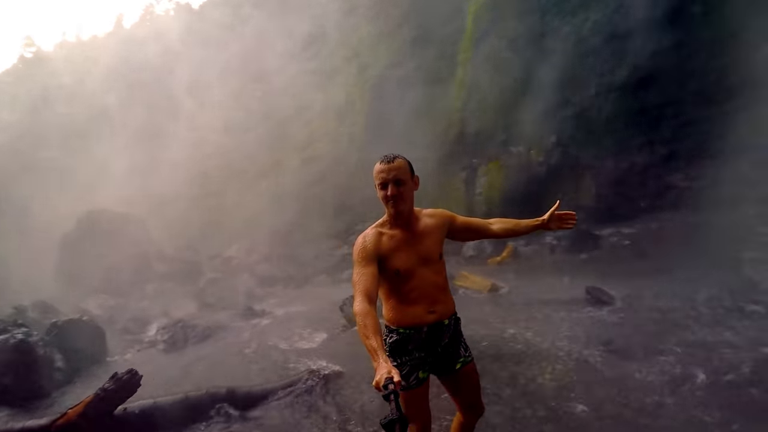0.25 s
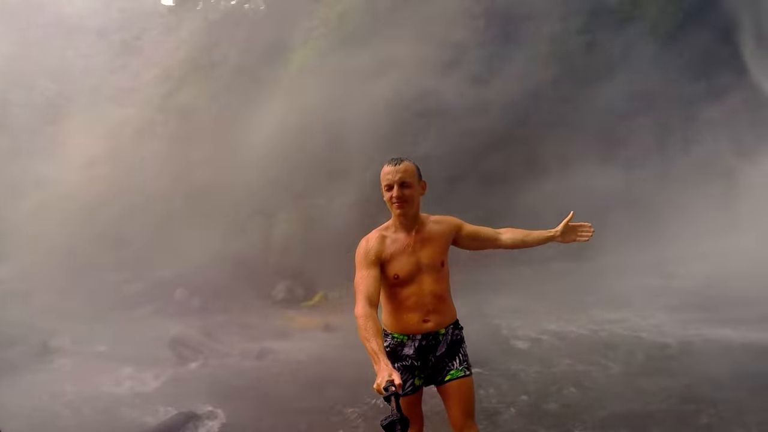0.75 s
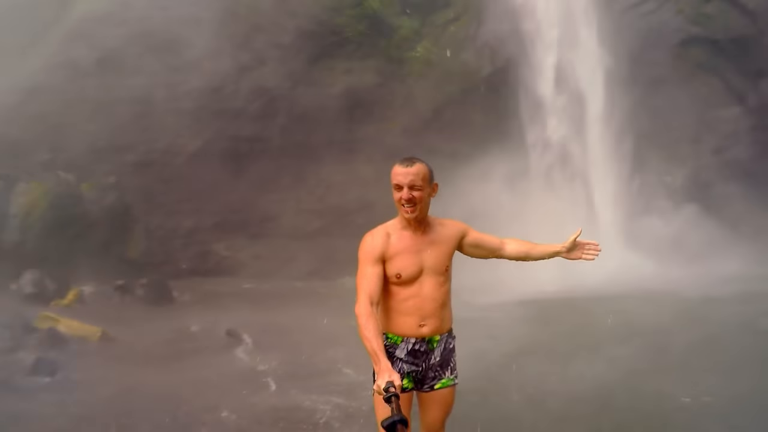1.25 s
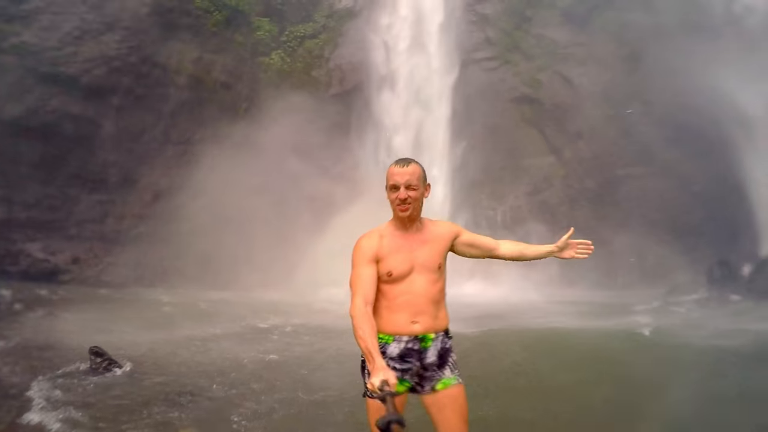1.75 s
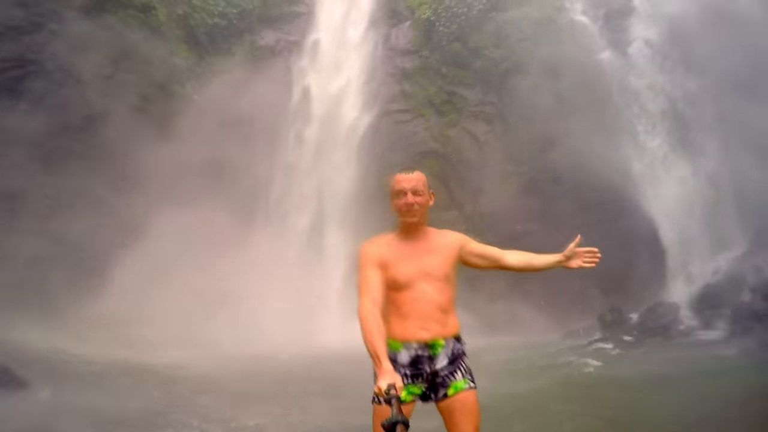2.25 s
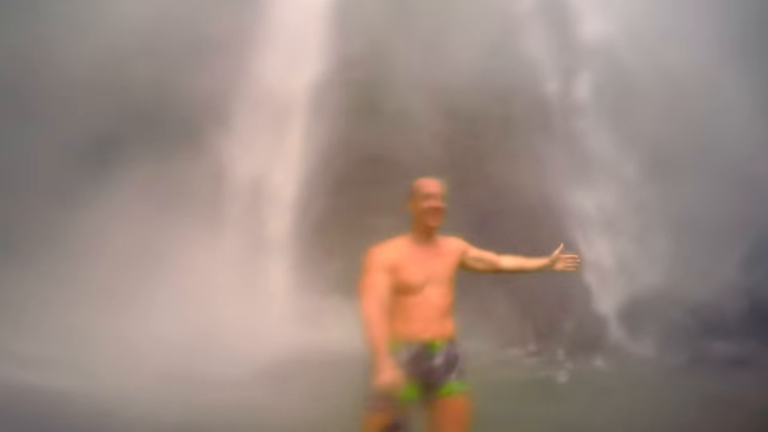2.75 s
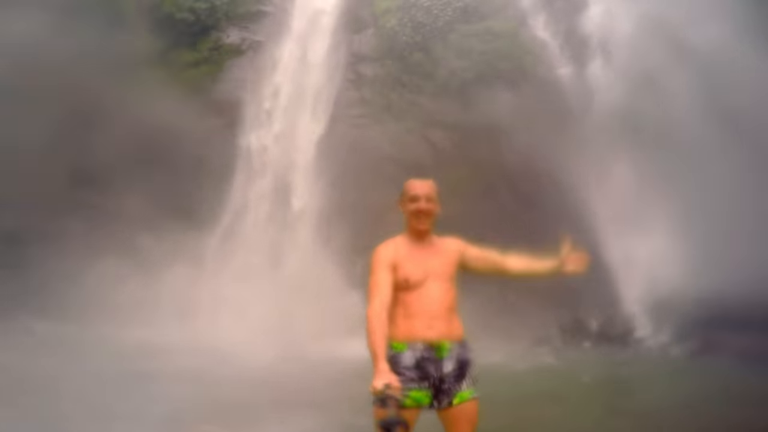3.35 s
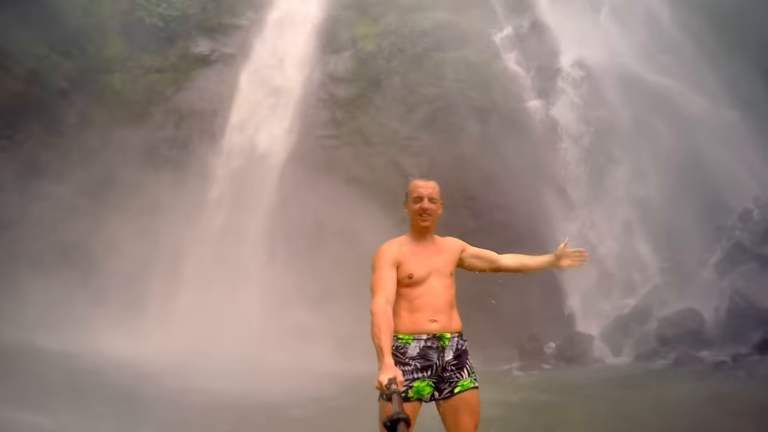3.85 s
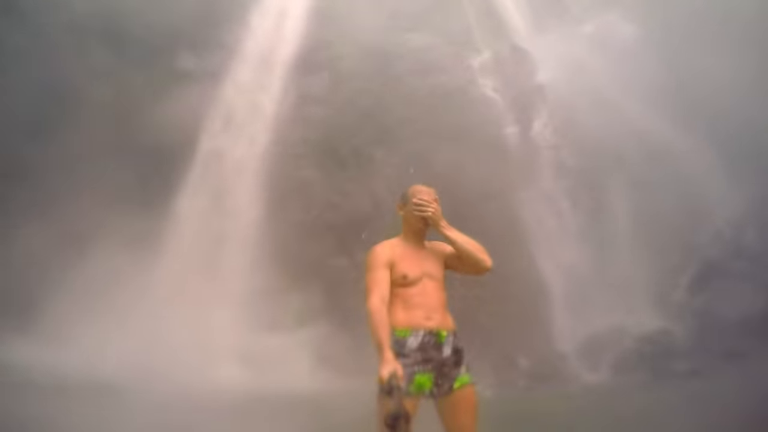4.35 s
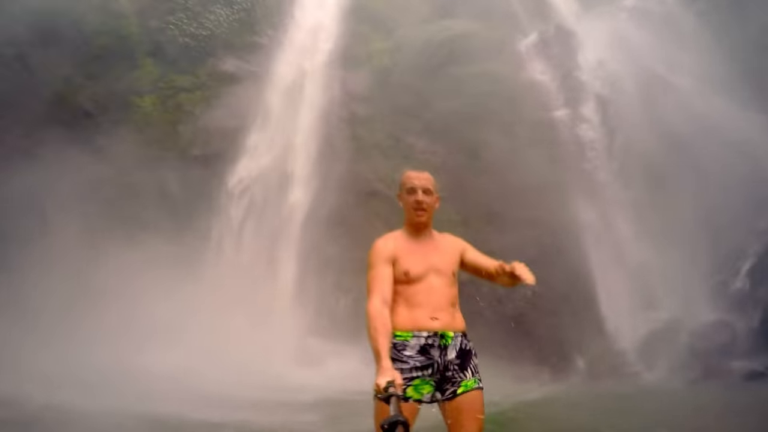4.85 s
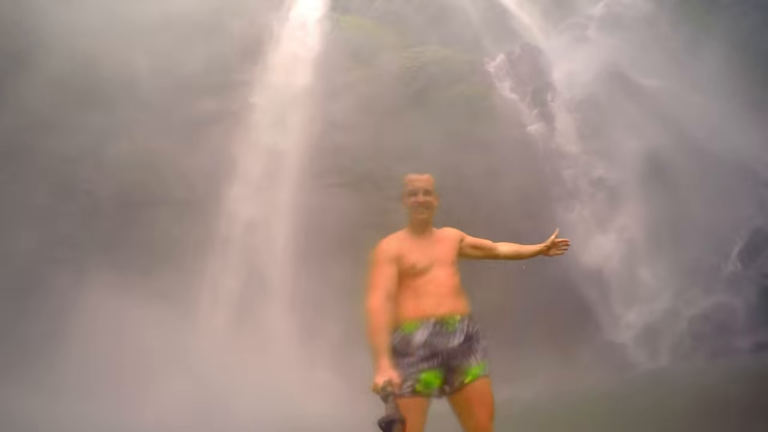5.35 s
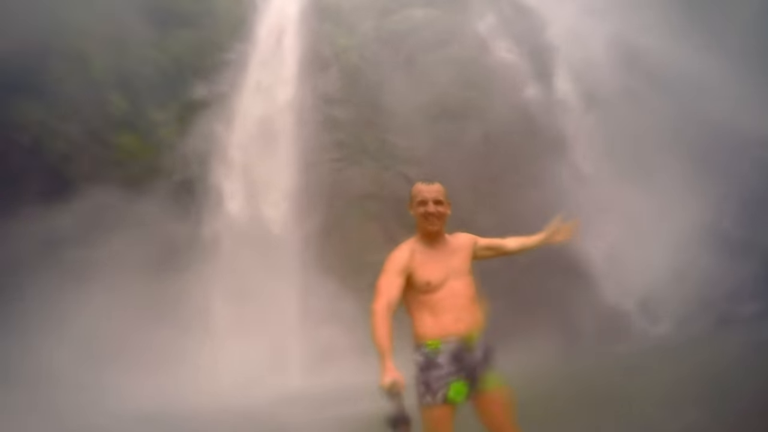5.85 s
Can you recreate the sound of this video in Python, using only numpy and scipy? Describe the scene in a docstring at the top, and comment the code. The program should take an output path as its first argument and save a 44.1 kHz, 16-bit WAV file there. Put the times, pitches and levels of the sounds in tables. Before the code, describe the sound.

Wind drones and thumps on an encased microphone beside a roaring waterfall, then spray bursts, fat drops and heavy splashes crackle against it.

```python
"""A tall waterfall beats into its pool, close to a microphone in a waterproof case; its roar is steady noise.
From the start, air booms and drones on the case, and gusts swell a splashing rush of noise and impulses.
At about 0.6 s water gurgles over the port; from 1 s a fine spray of noise, ticks and pings never stops.
From 0.3 s, thickest after 2 s, fat drops slap and ring; long rings are bubbles in the water film.
Heavy slugs of water thud between 2.4 and 2.7 s; the hardest hits overload the microphone."""
import sys
import numpy as np
from scipy import signal
from scipy.fft import rfft, irfft, next_fast_len
from scipy.io import wavfile
from scipy.ndimage import uniform_filter1d, map_coordinates

SR = 44100
rng = np.random.default_rng(int(sys.argv[2]) if len(sys.argv) > 2 else 0)


def store_pcm(level_fs):
    """Save levels as 16-bit WAV."""
    pcm = np.round(np.clip(level_fs, -1, 1) * 32767).astype(np.int16)
    wavfile.write(sys.argv[1], SR, np.atleast_2d(pcm).T)


N = 268789

# spectrum of drops hitting the case, before its resonances: (frequency [Hz], relative level [dB])
PATTER_SPECTRUM = [(150, -30.5), (500, -27.5), (1000, -16), (1600, -2), (2600, 1.5), (4400, 1.5),
                   (5600, -4.5), (7000, -3.5), (9500, -15.5), (12800, -14.5), (15200, -21.5)]


def water(rush_db, spray_db):
    """The splashing rush of the fall, and spray pattering on the case; both flicker in quick flurries."""
    # spectrum of the rush, before the case: (frequency [Hz], relative level [dB])
    rush_spectrum = [(60, -4.5), (200, -3.5), (350, -7.5), (550, -4.5), (800, -4), (1050, 0), (1600, -5),
                     (2600, -1.5), (3300, -8.5), (6000, -23), (15000, -42)]
    # spectrum of the fine spray, before the case: (frequency [Hz], relative level [dB])
    mist_spectrum = [(150, -33), (500, -14.5), (1000, -13), (1600, -9), (2600, -2.5), (4400, 0.5),
                     (5600, -4.5), (7000, -3), (9500, -10), (12800, -8), (15200, -16)]
    flurry = wobble(70)

    splash = 0.66 * rng.standard_normal(N) + 0.71 * impacts(count=4000, spread_db=3.5)
    rush_bubbles = bubbles(count=1500, pitch_hz=1590, scatter=0.127, cycles=37, spread_db=2.5)
    rush = unit(through_case(splash, rush_spectrum) + 0.68 * rush_bubbles)

    fine_drops = rng.standard_normal(N) + 0.5 * impacts(count=20000, spread_db=6.0)
    mist = through_case(fine_drops, mist_spectrum)
    hits = 0.66 * impacts(count=6000, spread_db=5.0) + ticks(count=600, spread_db=2.5, t60=0.0038)
    patter = through_case(hits, PATTER_SPECTRUM)
    pings = bubbles(count=2000, pitch_hz=3730, scatter=0.203, cycles=18, spread_db=5.0)
    spray = unit(0.47 * mist + 0.99 * patter + 0.42 * pings)

    rush_gain = amp(rush_db + 0.18 + 0.49 * flurry + 1.9 * wobble(45))
    spray_gain = amp(spray_db + 3.5 + 1.69 * flurry)
    return rush_gain * rush + spray_gain * spray


def drops_and_bubbles():
    """Most drops slap the case with noise and ring upward; long rings are film bubbles, almost without slap."""
    # fat drops on the case, and the gurgle's bubble with its overtone at 0.74 s; before the trims below:
    # (time [s], level [dB], starting ring pitch [Hz], ring decay by 60 dB [s])
    drop_rings = [(0.274, -7, 2880, 0.0074), (0.405, -11, 2950, 0.0072), (0.738, 4.5, 943, 0.034),
                  (0.74, -10, 1760, 0.021), (0.958, -16, 3800, 0.0092), (1.0557, 2.5, 2740, 0.012),
                  (1.207, -1.5, 3010, 0.013), (1.466, 2, 2760, 0.012), (1.492, 1, 1700, 0.012),
                  (1.647, 3, 4040, 0.013), (2.118, -5, 2600, .006), (2.189, 0.5, 2540, 0.0053),
                  (2.22, 1.5, 4600, 0.007), (2.339, 2.5, 1390, 0.012), (2.376, 8, 2630, 0.0062),
                  (2.378, 6.5, 1710, 0.0067), (2.431, 5, 3730, .007), (2.454, 5.5, 4270, 0.0032),
                  (2.4885, -2, 4600, 0.0033), (2.495, 2, 4180, 0.0037), (2.507, 5, 4650, 0.0038),
                  (2.685, 5.5, 2630, 0.0084), (2.7767, 1, 2400, 0.0025), (2.835, -3, 6840, 0.0034),
                  (3.077, -19, 490, 0.039), (3.246, -3, 4000, .005), (3.586, 3.5, 2880, 0.0061),
                  (3.653, -4, 2850, 0.017), (3.674, -5, 3800, 0.016), (3.69, 1.5, 3460, 0.013),
                  (3.72, -2.5, 2880, 0.013), (3.7721, 9, 1590, .012), (3.806, -2, 1640, .011),
                  (4.081, -3.5, 2600, 0.013), (4.123, 2, 1500, 0.011), (4.133, 3, 4270, 0.0069),
                  (4.138, 2.5, 1860, 0.0091), (4.185, 8, 4520, 0.0036), (4.233, 4, 1570, 0.0038),
                  (4.262, 3, 3870, .007), (4.285, 5, 2740, 0.0096), (4.378, 4.5, 4200, 0.0047),
                  (4.65, 8, 1850, 0.0039), (4.706, 6, 4030, 0.0031), (4.777, 10.5, 2540, 0.0056),
                  (4.7908, -6, 2600, 0.0084), (4.872, -9.5, 2800, 0.0051), (4.899, -14, 4200, .004),
                  (4.9213, -11, 4200, 0.0033), (4.943, -13.5, 3330, 0.0038), (5.307, -7, 1570, 0.014),
                  (5.336, 3, 4400, .005), (5.391, 5, 2470, 0.0026), (5.3974, 4.5, 4120, 0.0066),
                  (5.541, 8.5, 2680, 0.0072), (5.745, -7.5, 2420, 0.0076), (5.851, -8.5, 4160, 0.0066),
                  (6.051, -0.5, 2450, 0.0042)]
    rings, slaps = np.zeros((2, N + SR))
    t = np.arange(SR // 12) / SR
    for s, db, hz, t60 in drop_rings:
        start = round(s * SR)
        ring = amp(-60 * t / t60) * np.sin(2 * np.pi * hz * t * (1 + 0.063 * t / t60))
        onset = 1 - np.exp(-t / 0.00037)
        rings[start:][:len(t)] += amp(db - 2.0) * ring * onset
        # a sharp burst with a weaker, slower tail
        splash = amp(-60 * t / 0.0048) + amp(-19.5 - 60 * t / 0.018)
        # long rings are bubbles in the water film: little or no slap
        slap_db = db - 24 * max(0, np.log2(t60 / 0.011))
        slaps[start:][:len(t)] += amp(slap_db - 3.0) * splash * rng.standard_normal(len(t))
    return rings[:N] + coloured(slaps[:N], lambda hz: along(PATTER_SPECTRUM, hz) + case_db(hz))


def slugs():
    """A mass of water lands on the case: a short, full thud of decaying noise."""
    # heavy slugs, levels before a 1 dB trim: (time [s], level [dB])
    slug_hits = [(2.378, -8.5), (2.431, -4), (2.445, -17), (2.686, -11.5)]
    # spectrum of the thud, before the case: (frequency [Hz], relative level [dB])
    thud_spectrum = [(60, -14), (150, 8), (300, -2.5), (550, 1.5), (900, 2), (1700, -2), (3000, -3),
                     (5000, -11), (12000, -44)]
    force = np.zeros(N + SR)
    t = np.arange(SR // 8) / SR
    for s, db in slug_hits:
        force[round(s * SR):][:len(t)] += amp(db - 1 - 60 * t / 0.042)
    return force[:N] * through_case(rng.standard_normal(N), thud_spectrum)


def gurgle():
    """A film of water bubbles dully across the microphone port: dense impulses and low bubble rings."""
    # level of the water over the port: (time [s], level [dB])
    port_level = [(.59, -53), (.615, -30), (.632, -20.5), (.655, -22.5), (.67, -31), (.695, -23.5),
                  (.73, -30.5), (.77, -32), (.85, -64)]
    # spectrum of the froth on the port, before the case: (frequency [Hz], relative level [dB])
    wet_port_spectrum = [(100, -5), (350, 1.5), (650, 1.5), (1000, 7), (1400, -5), (2000, -11), (2600, -2),
                         (3100, -41), (8000, -32)]
    level_db, = curves(port_level)
    froth = through_case(impacts(count=20000, spread_db=3.5), wet_port_spectrum)
    blubs = bubbles(count=2000, pitch_hz=1070, scatter=0.09, cycles=11, spread_db=-1.0)
    return amp(level_db) * unit(froth + 0.5 * blubs)


def wind():
    """The downdraught heaves on the case; each buffet makes it boom and drone with an uneven flutter."""
    # slow heave of the air under the fall, before trim: (time [s], level [dB])
    downdraught = [(0.0, -31), (0.29, -29), (0.66, -29), (0.76, -20), (1.1, -17.5), (1.39, -34),
                   (1.46, -25), (1.87, -32), (2.42, -36), (2.47, -43), (2.68, -25.5), (2.76, -41),
                   (3.41, -30.5), (4.82, -37), (4.87, -61), (5.24, -29.5), (5.82, -48), (6.09, -43)]
    # buffets of air on the case, before trim and flutter:
    # (time at full strength [s], hold [s], boom level [dB], drone level [dB])
    buffets = [(0.13, 0.23, -28, -17), (0.45, 0.14, -27.5, -15.5), (0.66, 0.16, -30, -19.5),
               (1.03, 0.052, -17.5, -23), (1.15, 0.27, -17.5, -31), (1.48, 0.054, -12.5, -49),
               (1.69, 0.032, -17, -38), (1.8, 0.39, -23.5, -33), (2.07, 0.15, -17.5, -31.5),
               (2.27, 0.13, -17, -27.5), (2.5, 0.37, -28.5, -40), (2.88, 0.02, -44, -28),
               (3.03, 0.17, -24, -36.5), (3.29, 0.15, -22, -30.5), (3.56, 0.29, -30.5, -45.5),
               (4.01, 0.31, -29.5, -36), (4.57, 0.099, -28, -28.5), (4.7, 0.026, -30.5, -43),
               (5.09, 0.46, -31.5, -41.5), (5.62, 0.15, -42, -53), (6.03, 0.04, -23, -36)]
    heave_db, = curves(downdraught)
    boom_power, drone_power = swells(buffets)
    boom_db = level_of(boom_power, floor_db=-48) + 1.36 * wobble(17)
    drone_db = level_of(drone_power, floor_db=-58) + 1.9 * wobble(22) - 2.5
    heave = buffet(centre_hz=19.7, width_hz=8.2, gain_db=0.59, steadiness=0.24)
    boom = buffet(centre_hz=49.5, width_hz=8.2, gain_db=0.92, steadiness=0.63)
    drone = buffet(centre_hz=103.6, width_hz=10.3, gain_db=0, steadiness=0.29)
    return amp(heave_db + 0.5) * heave + amp(boom_db) * boom + amp(drone_db) * drone


def buffet(centre_hz, width_hz, gain_db, steadiness):
    """Turbulence (noise) rings one low resonance; a steadier flow evens out its swells."""
    def resonance_db(hz):
        detuning = (hz ** 2 - centre_hz ** 2) / (2 * width_hz * (hz + 1))
        return -20 * np.log10(1 + detuning ** 2)

    band = coloured(rng.standard_normal(N), resonance_db)
    power = np.abs(uniform_filter1d(band ** 2, SR // 16)) + 1e-12
    even = band / power ** (np.clip(steadiness, 0, 1) / 2)
    # steep low-pass at 132 Hz
    low = coloured(even, lambda hz: -10 * np.log10(1 + (hz / 132) ** 20))
    return amp(gain_db) * unit(low)


def far_fall():
    """The even roar of the plunge pool behind everything: steady noise."""
    # spectrum of the roar, before the case: (frequency [Hz], relative level [dB])
    far_spectrum = [(120, 2), (250, 3.5), (500, 1), (1000, 4), (2600, -6), (4500, -2), (7000, -6),
                    (10000, -8), (15000, -32)]
    return amp(-48.0) * through_case(rng.standard_normal(N), far_spectrum)


def impacts(count, spread_db):
    """Random impulses, many small and a few large; rms 1."""
    when, size, sign = rng.random((count, 3)).T
    weight = amp(-spread_db * np.log(size + 0.0044)) * np.sign(sign - 0.5)
    return unit(np.bincount((when * N).astype(int), weight, N))


def ticks(count, spread_db, t60):
    """Middle-sized drops that each burst into a short spatter of noise, 60 dB down after t60 s; rms 1."""
    t = np.arange(SR // 50) / SR
    hits = np.abs(impacts(count=count, spread_db=spread_db))
    envelope = signal.fftconvolve(hits, amp(-60 * t / t60))[:N]
    return unit(envelope * rng.standard_normal(N))


def bubbles(count, pitch_hz, scatter, cycles, spread_db):
    """Droplets that each ring at their own pitch, falling 60 dB in the given cycles; rms 1."""
    when, size, tone = rng.random((count, 3)).T[:, :, None]
    hz = np.clip(pitch_hz * (tone / (1 - tone)) ** scatter, SR / 100, SR / 5)
    k = np.arange(SR // 100)
    turns = hz * k / SR
    level_db = -spread_db * np.log(size + 0.027) - 60 * turns / cycles
    rings = amp(level_db) * np.sin(2 * np.pi * turns)
    places = (when * N).astype(int) + k
    return unit(np.bincount(places.ravel(), rings.ravel(), N)[:N])


def case_db(hz):
    """The peaks and dips in dB that the resonances of the case add to a sound."""
    # resonances of the case: (frequency [Hz], width [Hz], lift [dB])
    case_modes = [(358, 28, -18.5), (1600, 470, 6), (2076, 200, -4.5), (2400, 226, 6), (2800, 260, 5),
                  (3310, 810, -5), (4280, 2800, 3.5), (5480, 370, -3.5), (6770, 460, 2), (7560, 550, -4.5),
                  (8120, 940, 3)]
    return sum(db / (1 + (2 * (hz - centre) / width) ** 2) for centre, width, db in case_modes)


def through_case(x, spectrum):
    """Give x a spectrum and the resonances of the case; rms 1."""
    return unit(coloured(x, lambda hz: along(spectrum, hz) + case_db(hz)))


def coloured(x, gain_db, size=32768):
    """x through the causal minimum-phase filter whose gain is gain_db(Hz)."""
    cepstrum = irfft(np.log(amp(gain_db(np.fft.rfftfreq(size, 1 / SR))) + 1e-6))
    # folding the cepstrum forward in time makes the filter causal
    cepstrum[1:size // 2] *= 2
    cepstrum[size // 2 + 1:] = 0
    return signal.fftconvolve(x, irfft(np.exp(rfft(cepstrum))))[:N]


def swells(rows):
    """Power of (time, hold, level, ..) events that rise, hold and die away; one curve per level column."""
    attack_s, release_s = 0.028, 0.074  # time to rise and to die away by 10 dB
    t = np.linspace(0, N / SR, N // 40)
    start, hold, *levels = np.transpose(rows)
    before = np.maximum(start[:, None] - t, 0) / attack_s
    after = np.maximum(t - (start + hold)[:, None], 0) / release_s
    power = amp(levels) ** 2 @ amp(-10 * (before + after)) ** 2
    return curves(np.column_stack([t, *power]))


def level_of(power, floor_db):
    """Level in dB of a power curve on top of a steady floor."""
    return 10 * np.log10(power + amp(floor_db) ** 2)


def curves(rows):
    """One value per sample for each column after the time."""
    s, *cols = np.transpose(rows)
    return [np.interp(np.arange(N) / SR, s, c) for c in cols]


def wobble(rate):
    """A smooth random curve, rate knots a second."""
    knots = rng.standard_normal(int(N * rate / SR) + 4)
    return map_coordinates(knots, [np.arange(N) * rate / SR])


def along(points, hz):
    """Read (Hz, value) points on a log frequency axis."""
    f, v = np.transpose(points)
    return np.interp(np.log(hz + 1), np.log(f + 1), v)


def amp(db):
    """Decibels to gain."""
    return 10 ** (np.asarray(db) / 20)


def unit(x):
    """Scale to rms 1."""
    return x / np.sqrt(np.mean(x ** 2) + 1e-20)


def scene():
    """The gusts drive spray and rush; everything meets at one microphone."""
    # gusts that throw water at the case, before trims and flurries:
    # (time at full strength [s], hold [s], spray level [dB], rush level [dB])
    gusts = [(0.125, 0.28, -39.5, -33), (0.46, 0.11, -42, -42), (0.64, 0.32, -48, -32.5),
             (0.9, 0.15, -44, -31), (1.03, 0.13, -31, -25.5), (1.21, 0.19, -34, -27),
             (1.38, 0.098, -35.5, -24.5), (1.505, 0.13, -21, -28), (1.86, 0.22, -31.5, -33),
             (2.12, 0.09, -29.5, -31), (2.32, 0.02, -27, -22), (2.45, 0.083, -26.5, -22),
             (2.55, 0.1, -23, -27.5), (2.69, 0.19, -26.5, -27.5), (2.97, 0.21, -33, -36),
             (3.27, 0.017, -29.5, -29.5), (3.37, 0.044, -21, -27), (3.52, 0.11, -27, -29),
             (3.67, 0.21, -33.5, -27.5), (4.0, 0.14, -30, -28), (4.11, 0.11, -33, -23.5),
             (4.25, 0.041, -22.5, -23), (4.33, 0.018, -28, -29.5), (4.575, 0.063, -22.5, -26),
             (4.72, 0.015, -21.5, -28.5), (5.07, 0.076, -33, -42), (5.15, 0.22, -30, -31.5),
             (5.37, 0.04, -29.5, -37), (5.44, 0.024, -20, -21.5), (5.545, 0.0096, -22.5, -21.5),
             (5.62, 0.18, -33.5, -44), (6.01, 0.025, -30.5, -39.5)]
    spray, rush = swells(gusts)
    # between gusts a fine spray stays; it is 14 dB weaker in the first second
    spray_floor_db = -47 + np.where(np.arange(N) / SR < 1, -14, 0)
    splashing = water(level_of(rush, floor_db=-48), level_of(spray, spray_floor_db))
    return (far_fall() + wind() + splashing + gurgle() + drops_and_bubbles() + slugs())[None]


def record(dry):
    """The microphone rounds off the hardest hits; nothing passes above the band limit."""
    ceiling, top_hz = 0.97, 15400
    clipped = dry / (1 + np.abs(dry / ceiling) ** 6) ** (1 / 6)
    m = next_fast_len(N + SR // 2)
    passed = np.fft.rfftfreq(m, 1 / SR) < top_hz
    return irfft(rfft(clipped, m) * passed, m)[..., :N]


dry = scene()
out = record(dry)
store_pcm(out)
```